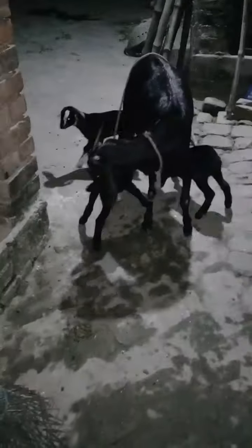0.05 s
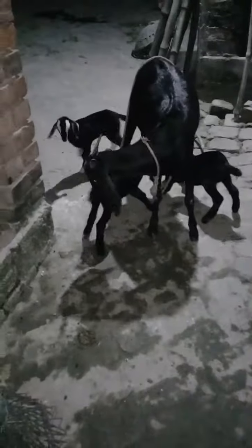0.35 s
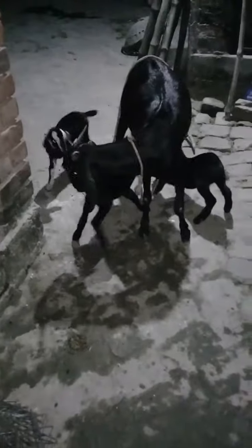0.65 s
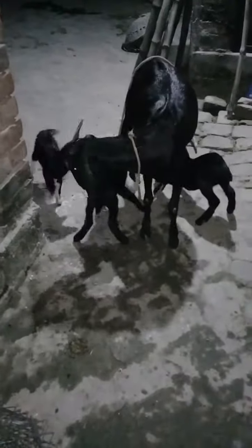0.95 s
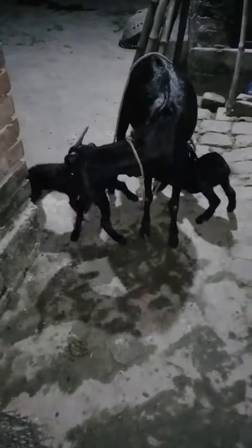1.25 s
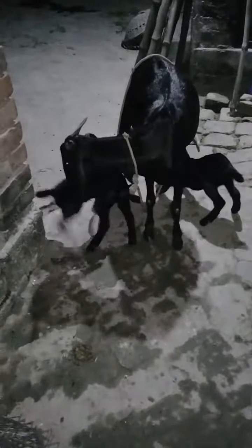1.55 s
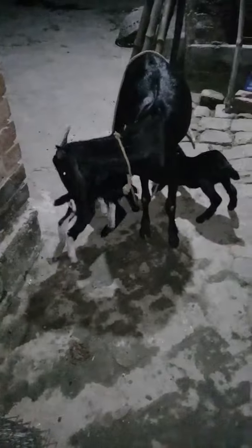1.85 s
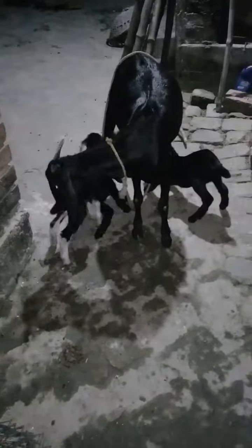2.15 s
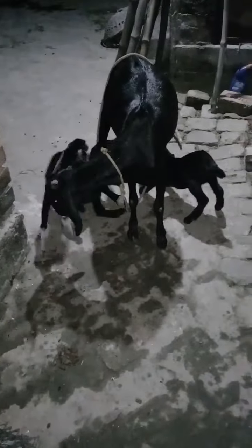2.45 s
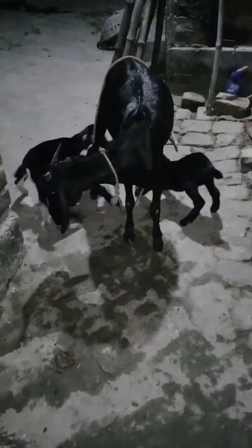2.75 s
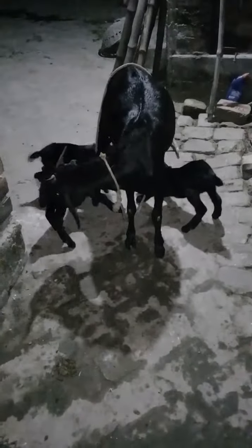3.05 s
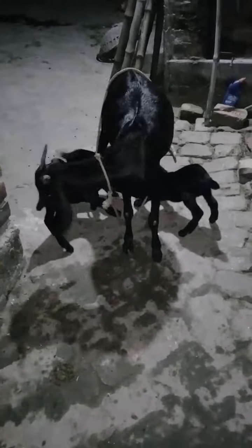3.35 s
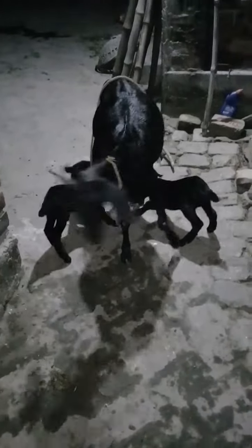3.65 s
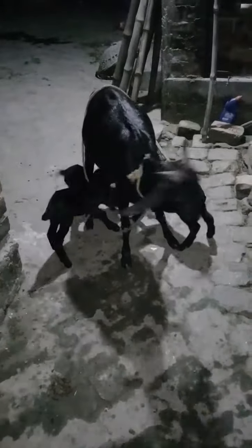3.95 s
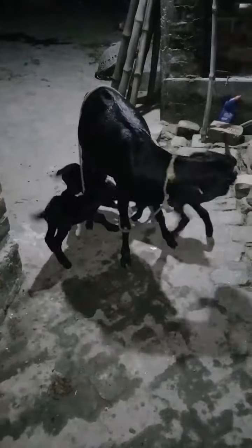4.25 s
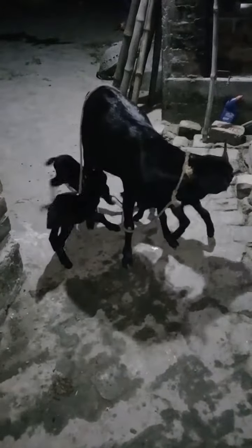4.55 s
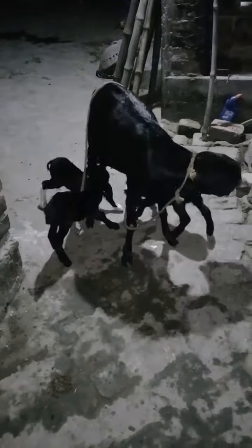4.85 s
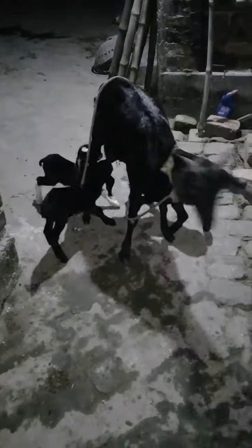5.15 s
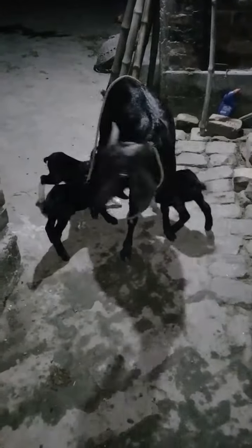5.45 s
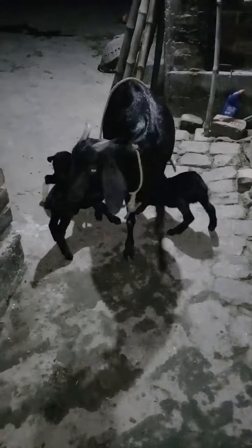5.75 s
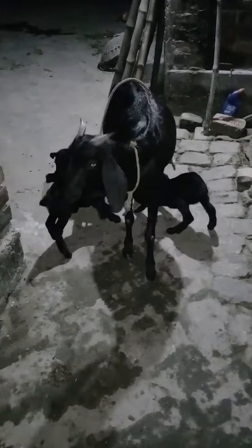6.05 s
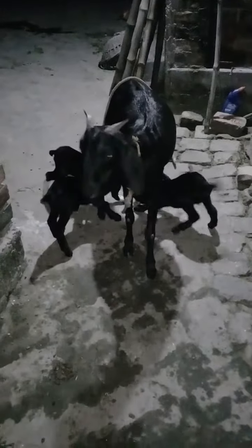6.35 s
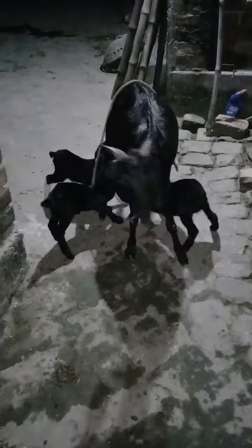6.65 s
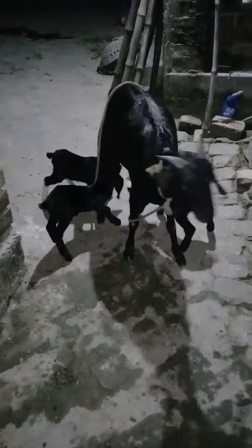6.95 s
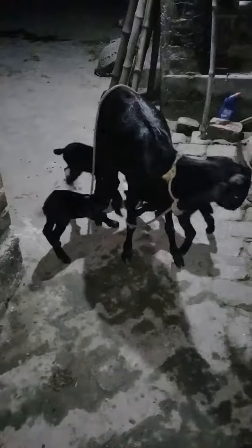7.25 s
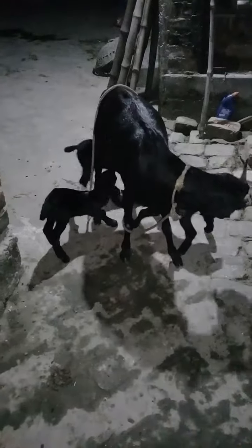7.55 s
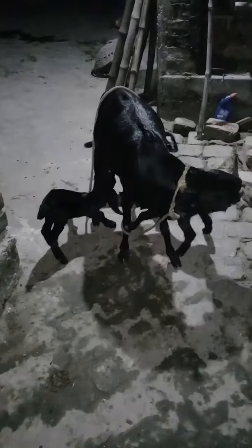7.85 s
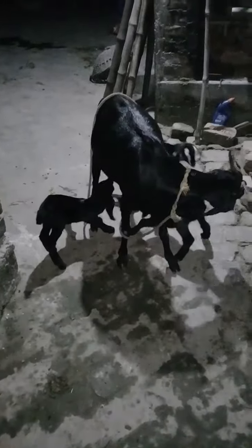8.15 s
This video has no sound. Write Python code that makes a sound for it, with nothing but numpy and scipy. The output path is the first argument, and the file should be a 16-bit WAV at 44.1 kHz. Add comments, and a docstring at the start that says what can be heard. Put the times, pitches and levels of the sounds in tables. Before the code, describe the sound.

Short squeaky calls of goat kids and light shuffling hoof steps in a yard, ending with two rasping bleats, a soft hum behind.

```python
"""Goat kids in a paved yard at night

Kids jostle round their mother with short hoarse squeaks, softer whines and two longer rasping bleats:
slack vocal folds chop the breath, and narrow ringing peaks colour the sound. Hooves tap and scuff on
gritty bricks, and the walls return a short tail. Behind them a low hum swells now and then and dies
down, and distant tones come and go under a faint steady hiss."""
import sys
import numpy as np
from scipy import signal
from scipy.fft import rfft, irfft, next_fast_len
from scipy.io import wavfile
from scipy.ndimage import uniform_filter1d

SR = 44100
rng = np.random.default_rng(int(sys.argv[2]) if len(sys.argv) > 2 else 0)


def master(y):
    """Save y as 16-bit WAV."""
    cut = np.clip(np.atleast_2d(y).T, -1, 1)
    pcm = np.round(cut * 32767)  # scale
    wavfile.write(sys.argv[1], SR, pcm.astype(np.int16))


N = 361175
TIME = np.arange(N) / SR

# calls: t/s, duration/s, level/dB, brightness/dB, pitch shift/semitones, widest gape/share of duration
SQUEAKS = [(1.028, .072, -46, 1, -0.37, 0.56), (1.254, .096, -47.5, 3.5, -0.58, 0.46),
           (1.826, 0.074, -45.5, -6, -0.37, 0.5), (2.072, 0.086, -46.5, 1.5, -0.28, 0.4),
           (2.315, 0.11, -47, 3, -0.44, 0.54), (2.660, 0.079, -50.5, 1, -0.25, 0.49),
           (2.799, 0.089, -44.5, -0.5, 0.07, 0.57), (3.017, 0.1, -45, 3.5, 0.24, 0.5),
           (3.341, 0.09, -43.5, -1, 0.12, 0.45), (3.542, 0.1183, -44.5, 5.5, .1, .42),
           (3.862, .100, -44.5, 2, 0.21, 0.49), (4.027, 0.11, -45, 4.5, .1, 0.56),
           (5.298, 0.074, -43.5, 1, .6, 0.62), (5.473, .110, -44.5, 5.5, 0.27, 0.51)]
WHINES = [(.135, 0.088, -61, -9, -0.34, .42), (.375, 0.088, -53, -3.5, -0.51, 0.68),
          (.800, 0.074, -55, -11, -0.63, .42), (1.974, 0.075, -53, -5.5, .8, .48),
          (4.420, 0.1593, -48, 0.5, .25, 0.17), (4.899, 0.15, -46.5, 2, 0.084, 0.75),
          (5.99, 0.12, -53.5, -5.5, -0.35, 0.62)]
BLEATS = [(6.735, 0.37, -42.5, 4, .2, .64), (7.574, 0.37, -42.5, 4, 0.18, 0.71)]
# narrow ringing peaks that colour the calls: f/Hz, nominal bandwidth/Hz, level/dB
SQUEAK_PEAKS = [(1403, 110, -0.5), (1482, 63, -6.5), (1715, 46.5, 3.5), (1813, 82, 3), (2133, 98, 1),
                (2314, 44, -10.5), (2725, 73, -7.5), (3020, 110, -19.5)]
WHINE_PEAKS = [(1408, 98, 0.5), (1690, 59, 2), (1810, 78, 1), (2107, 86, -1.5), (2250, 59, -19),
               (2520, 79, -18.5)]
BLEAT_PEAKS = [(1071, 30, -13), (1516, 170, -2), (1804, 86, 1), (2123, 155, -5.5), (2334, 37, -4),
               (2918, 51, -11.5)]


def goat_kids():
    """Source and filter: hoarse airflow is shaped into squeaks, closed-mouth whines and long bleats."""
    squeak_air = vocal_folds(flutter_hz=353.3, jitter=.2, rough_db=1.5, pulse_share=0.36)
    bleat_air = vocal_folds(flutter_hz=378.5, jitter=.25, rough_db=2.0, pulse_share=0.42)
    squeaks = shape_calls(SQUEAKS, SQUEAK_PEAKS, squeak_air, attack_s=0.0034, release_s=0.016,
                          arch_db=9, gape_db=7.5, open_s=0.021, close_s=.025, scoop=.07, sag=.02,
                          bend_semitones=.15, shut_db=7, tilt_per_octave=2.25, rasp_db=0)
    whines = shape_calls(WHINES, WHINE_PEAKS, squeak_air, attack_s=0.021, release_s=0.028,
                         arch_db=-1, gape_db=3.5, open_s=0.02, close_s=0.0119, scoop=0.025, sag=0.0212,
                         bend_semitones=0.151, shut_db=6, tilt_per_octave=8.5, rasp_db=-8.5)
    bleats = shape_calls(BLEATS, BLEAT_PEAKS, bleat_air, attack_s=0.04, release_s=0.06,
                         arch_db=1.7, gape_db=10.5, open_s=.045, close_s=0.038, scoop=0.055, sag=0.055,
                         bend_semitones=.45, shut_db=11.5, tilt_per_octave=1.9, rasp_db=-3)
    return squeaks + whines + bleats


def vocal_folds(flutter_hz, jitter, rough_db, pulse_share):
    """Aperiodic oscillation: slack folds flap irregularly and chop the rushing air."""
    cycles = np.cumsum(flutter_hz * np.exp(jitter * drift(300))) / SR
    pulses = unit_power(np.diff(np.floor(cycles), prepend=0))
    airflow = np.sqrt(pulse_share) * pulses + np.sqrt(1 - pulse_share) * noise()
    return unit_power(airflow * from_db(rough_db * drift(160)))


# airy upper peaks, strongest when the mouth is wide open: f/Hz, nominal bandwidth/Hz, level/dB
RASP_PEAKS = [(3490, 340, -25), (4230, 120, -22), (5384, 285, -19), (6110, 110, -24)]
TREMOR_DB, TREMORS_PER_S = 0.87, 70


def shape_calls(calls, peaks, source, attack_s, release_s, arch_db, gape_db, open_s, close_s,
                scoop, sag, bend_semitones, shut_db, tilt_per_octave, rasp_db):
    """Time-varying filtering: a call brightens as the mouth opens, then dulls and sags as it closes."""
    envelope, brightness, pitch, shut, closing = np.zeros((5, N))
    for start, length, db, bright_db, semitones, widest in calls:
        live = (TIME > start) & (TIME < start + length)
        since = TIME[live] - start
        left = length - since
        narrowing = 1 - arch(since, length, widest)
        pitch[live] = semitones - bend_semitones * narrowing
        fade = np.minimum(since / attack_s, 1) * np.minimum(left / release_s, 1)
        envelope[live] = fade * from_db(db - arch_db * narrowing)
        brightness[live] = bright_db - gape_db * narrowing
        shut[live] = np.exp(-(since / open_s) ** 2)
        closing[live] = np.exp(-left / close_s)
    envelope *= from_db(TREMOR_DB * drift(TREMORS_PER_S))
    # the whole voice scoops up at the start and sags at the end
    read_position = np.cumsum(2 ** (pitch / 12) - scoop * shut - sag * closing)
    rasp = [(hz, width_hz, db + rasp_db) for hz, width_hz, db in RASP_PEAKS]
    voice, low_voice = np.zeros((2, N))
    for hz, width_hz, db in list(peaks) + rasp:
        ring = from_db(db) * resonate_twice(source, hz, 1.49 * width_hz)
        ring = np.interp(read_position, np.arange(N), ring)
        treble_weight = np.clip(tilt_per_octave * np.log2(hz / 1600), 0, 1.7)
        muffling_db = shut_db * shut * np.clip((hz - 1500) / 250, 0, 2)
        ring *= from_db(treble_weight * (brightness - 4.1 * closing) - muffling_db)
        voice += ring
        low_voice += ring * (hz < 1950)
    # steady lung pressure holds the power of the low peaks even
    power = np.maximum(uniform_filter1d(low_voice ** 2, size=900), 0) + 0.19 * np.mean(low_voice ** 2)
    return envelope * voice / np.sqrt(power)


# hoof steps: t/s, thud level/dB, clack level/dB
STEPS = [(1.499, -63.5, -82), (1.523, -46, -56.5), (1.661, -52, -71), (1.778, -57, -71),
         (1.852, -43.5, -47.5), (2.295, -60, -70), (2.433, -60, -53), (2.646, -51.5, -60), (2.78, -51, -68),
         (2.819, -42.5, -62), (3.395, -53, -50), (4.611, -66, -56.5), (4.868, -55.5, -58.5),
         (5.287, -58, -78), (5.798, -58, -83), (5.887, -47.5, -78), (6.155, -69, -46), (6.359, -58.5, -83),
         (6.491, -67, -66)]
# hollow ring of a hoof on brick: f/Hz, bandwidth/Hz, level/dB
THUD_MODES = [(287, 100, -2), (622, 130, -2), (823, 68, 6), (1020, 220, -2.5)]


def hooves():
    """Impact excites damped modes: each hoof lands with a hollow thud and a short clack."""
    times, thud_db, clack_db = np.transpose(STEPS)
    knock = noise()
    ring = sum(from_db(db) * (-1) ** k * resonate(knock, hz, width_hz)
               for k, (hz, width_hz, db) in enumerate(THUD_MODES))
    thud = steadied(ring, window_s=0.016) * bursts(times, thud_db, t60=0.07)
    clack = steadied(band(noise(), 1270, 2270, order=3), window_s=0.0047)
    return band(thud, 200, 1400) + clack * bursts(times, clack_db, t60=0.074)


# grit breaking: t/s, snap level/dB, crackle level/dB
SNAPS = [(1.188, -58, -94), (1.3493, -53, -89), (1.523, -44.5, -88), (1.6623, -52, -79), (1.7793, -54, -82),
         (2.0909, -41, -71), (2.296, -50, -89), (2.4896, -43.5, -89), (2.6888, -48.5, -92),
         (3.393, -50.5, -90), (3.6554, -39, -79), (3.694, -37.5, -49), (4.8935, -42, -62),
         (5.6439, -54, -67), (5.668, -52, -61.5), (5.884, -51.5, -89), (5.994, -52.5, -95),
         (6.1578, -42, -89), (6.4623, -60, -71), (6.7693, -47, -100)]
# ring of a snap: f/Hz, level/dB, nominal decay time/s
SNAP_MODES = [(2910, -2.5, 0.019), (3880, 3.5, 0.022), (4140, 5.5, 0.0044), (4780, 5, 0.0036),
              (5840, -12, 0.003)]


def snapping_grit():
    """Brittle fracture: grit snaps under a hoof with a brief high ring and a fine crackle."""
    times, snap_db, crackle_db = np.transpose(SNAPS)
    crush = noise() * bursts(times, snap_db, t60=0.038)
    snap = sum(from_db(db) * resonate(crush, hz, 2.55 / decay_s) for hz, db, decay_s in SNAP_MODES)
    crackle = unit_power(band(noise(), 6200, 14000)) * bursts(times, crackle_db, t60=0.06)
    return band(snap, 2200, 6260, order=3) + crackle


# feet dragging over brick: t/s, duration/s, scuff level/dB, grit level/dB
SCUFFS = [(0, 0.064, -82, -74), (0.092, .1, -64.5, -92), (.37, .16, -87, -74.5), (.83, 0.11, -71.5, -82),
          (1.277, 0.1, -63, -77), (1.49, 0.13, -59, -73), (1.649, 0.079, -56, -69),
          (1.748, 0.16, -57.5, -72), (1.972, 0.068, -61, -85), (2.077, .09, -65.5, -80),
          (2.322, .06, -65, -84), (2.411, 0.12, -57.5, -68), (2.557, 0.079, -63.5, -69.5),
          (2.643, 0.13, -58, -87), (2.798, 0.1, -57, -81), (3.382, 0.16, -62.5, -83),
          (4.462, .07, -67, -74), (5.277, 0.056, -58, -85), (5.494, 0.16, -63, -86),
          (5.616, 0.076, -66.5, -73), (6.157, 0.056, -63, -87), (6.87, 0.11, -66, -77),
          (7.677, 0.11, -59, -81), (8.15, .08, -59.5, -81)]
# a hoof sliding over grit: t/s, duration/s, level/dB
SLIDES = [(0.534, .08, -64), (3.644, 0.075, -46.5)]
# restless shifting between the scuffs: t/s, level/dB
SHIFTING = [(0, -75.5), (1.0, -70.5), (2.0, -73), (2.9, -70.5), (3.2, -78.5), (3.6, -71.5), (5.4, -76.5),
            (6.6, -75), (7.4, -72), (8.1, -81.5)]
# friction spectra: f/Hz, level/dB
SCUFF_SPECTRUM = [(76, -53), (130, -3), (342, -3), (404, -2), (546, -6.5), (801, -4), (1030, -3.5),
                  (1340, -7.5), (2620, -24), (5010, -17), (7000, -29), (9100, -58), (15400, -120)]
GRIT_SPECTRUM = [(3000, -10), (5500, 11.5), (8000, -4), (12000, 1.5), (16000, -1)]
SLIDE_SPECTRUM = [(350, -53), (600, -18), (1140, -1.5), (1240, 0.5), (1430, -4), (1990, -7.5),
                  (2610, -12.5), (5380, -12), (6420, -24), (11500, -25), (15600, -37)]
SHIFT_SWING_DB, SHIFTS_PER_S, SHIFT_GRIT_DB = 3.5, 12, -13.5


def shuffling():
    """Friction on rough brick: many tiny impacts merge into coarse scuffs, fine grit and two slides."""
    starts, lengths, scuff_db, grit_db = np.transpose(SCUFFS)
    shifting = from_db(in_time(SHIFTING)[0] + SHIFT_SWING_DB * drift(SHIFTS_PER_S))
    scuff_level = np.hypot(swells(starts, lengths, scuff_db, top_share=0.37), shifting)
    grit_level = np.hypot(swells(starts, lengths, grit_db, top_share=0.29),
                          from_db(SHIFT_GRIT_DB) * shifting)
    slide_level = swells(*np.transpose(SLIDES), top_share=0.37)
    scuff = colour(grains(per_s=1500, spread_db=1.83) * from_db(2.25 * drift(50)), SCUFF_SPECTRUM)
    scuff /= np.std(band(scuff, 287, 990))
    grit = colour(grains(per_s=3000, spread_db=2.8), GRIT_SPECTRUM)
    slide = colour(grains(per_s=4000, spread_db=2.9), SLIDE_SPECTRUM)
    return scuff_level * scuff + grit_level * grit + slide_level * slide


def yard(direct, t60=0.27, gap_s=.008):
    """Reverberation: brick walls send back a short, exponentially decaying tail."""
    t = TIME[:SR]
    tail = band(noise(), 190, 12200, order=1)[:SR] * from_db(-60 * t / t60) * (t > gap_s)
    tail *= 2 * from_db(-16) / np.sqrt(np.sum(tail ** 2))
    return direct + signal.fftconvolve(direct, tail)[:N]


# slow course of the hum: t/s, hum level/dB, rumble level/dB
HUM_LEVELS = [(0, -55, -68.5), (1.3, -60, -62.5), (2.6, -54.5, -64.5), (3.1, -60.5, -65.5), (3.9, -55, -67),
              (4.7, -58, -62.5), (4.95, -62.5, -68), (5.4, -62, -68), (6.1, -70.5, -70.5), (7.3, -75, -72),
              (7.8, -72, -64.5), (8.19, -82, -75)]
# resonances of the hum: f/Hz, nominal bandwidth/Hz, level/dB
HUM_MODES = [(68.1, 13.2, 0.5), (83.8, 8, -0.5), (97, 6.7, -11.5)]
# brief booms of the hum and dull bumps of the rumble: t/s, duration/s, level/dB
BOOMS = [(0.322, .18, -50), (0.801, .09, -50), (0.885, 0.096, -47), (1.274, 0.13, -47), (1.367, 0.13, -50),
         (1.75, .1, -49), (1.89, 0.091, -50.5), (2.21, 0.16, -48), (2.369, 0.06, -49.5),
         (2.693, 0.16, -46.5), (3.179, 0.13, -46.5), (3.663, 0.055, -48.5), (4.131, 0.11, -50),
         (4.223, .13, -55), (4.603, 0.12, -51), (4.718, 0.066, -51), (5.09, .08, -52.5),
         (5.563, .07, -53.5)]
BUMPS = [(1.3, .08, -59), (1.481, 0.052, -53), (2.331, .06, -52.5), (2.753, 0.061, -56),
         (3.644, 0.094, -57.5), (4.181, 0.081, -59.5), (4.807, 0.076, -57), (5.043, 0.13, -58),
         (5.87, 0.087, -58.5), (6.883, 0.063, -55)]
# rumble above the hum: f/Hz, level/dB
RUMBLE_SPECTRUM = [(30, -18), (60, -2.5), (120, 5), (170, 1), (260, 1), (400, -15), (700, -30.5)]


def hum():
    """Noise-driven resonance: low modes boom up repeatedly, then die down beneath a dull rumble."""
    hum_db, rumble_db = in_time(HUM_LEVELS)
    modes = np.zeros(N)
    for hz, width_hz, db in HUM_MODES:
        mode = resonate(noise(), hz, 1.48 * width_hz)
        modes += from_db(db) * unit_power(resonate(mode, hz, 1.35 * width_hz))
    hum_level = np.hypot(from_db(hum_db), swells(*np.transpose(BOOMS), top_share=0.38))
    drone = band(hum_level * steadied(modes, window_s=0.049), 54.4, 150, order=3)
    rumble_level = np.hypot(from_db(rumble_db), swells(*np.transpose(BUMPS), top_share=0.52))
    return drone + rumble_level * steadied(colour(noise(), RUMBLE_SPECTRUM), window_s=0.043)


# distant tones: start t/s, end t/s, f/Hz, bandwidth per filter pass/Hz, level/dB
FAR_TONES = [(.18, 0.43, 1970, 350, -68.5), (0.445, 0.983, 2840, 507, -76.5), (5.57, 5.862, 2460, 180, -72),
             (6.346, 6.64, 733, 109, -74), (7.116, 7.625, 900, 220, -70), (8.12, 8.262, 960, 90.5, -69),
             (8.137, 8.26, 2010, 160, -64.5)]


def far_tones():
    """Narrow-band noise has a rough pitch: faint hoarse tones swell and fade in the distance."""
    tones = np.zeros(N)
    for start, end, hz, width_hz, db in FAR_TONES:
        swell = np.sin(np.pi * np.clip((TIME - start) / (end - start), 0, 1))
        tones += from_db(db) * swell * unit_power(resonate_twice(noise(), hz, width_hz))
    return tones


# low air noise, hiss common to both ears, hiss opposite between the ears: f/Hz, level/dB
AIR_SPECTRUM = [(15, -43), (25, -16.5), (60, 0.5), (92, 3), (262, -12), (569, -18.5), (911, -17.5),
                (1520, -21), (1940, -23.5), (3300, -26), (4290, -69), (7260, -120)]
HISS_SPECTRUM = [(1760, -36), (3000, -14.5), (3190, -45), (3300, -29), (3590, -18.5), (4090, -8.5),
                 (4320, -1), (5240, 4), (5540, -3.5), (5810, -8.5), (6760, -5), (7290, -17), (7980, -22.5),
                 (13500, -20), (15600, -20.5)]
SIDE_SPECTRUM = [(200, -6), (2000, -16), (4500, -16), (7000, 0), (12000, 3.5), (16000, 2)]
AIR_DB, HISS_DB, SIDE_DB = -66.5, -66.5, -84


def air_and_hiss():
    """Stationary noise: a low rush and a hiss, widened by a faint part in antiphase at the ears."""
    air = from_db(AIR_DB) * colour(noise(), AIR_SPECTRUM)
    hiss = from_db(HISS_DB) * colour(noise(), HISS_SPECTRUM)
    side = from_db(SIDE_DB) * colour(noise(), SIDE_SPECTRUM)
    return air + hiss + side * np.array([[1], [-1]])


def from_db(db):
    """Level to amplitude ratio."""
    return 10 ** (np.asarray(db) / 20)


def unit_power(x):
    """Normalisation to a mean square of one."""
    return x / np.sqrt(np.mean(x ** 2) + 1e-20)


def in_time(rows):
    """Linear interpolation over time, one curve per level column."""
    times, *columns = np.transpose(rows)
    return [np.interp(TIME, times, column) for column in columns]


def noise():
    """White Gaussian noise."""
    return rng.standard_normal(N)


def drift(per_s):
    """Random fluctuation of unit variance, with `per_s` new values a second."""
    return np.interp(TIME * per_s, np.arange(8192), rng.standard_normal(8192)) * np.sqrt(3 / 2)


def grains(per_s, spread_db):
    """Shot noise: random tiny clicks of uneven size, at unit power."""
    sizes = from_db(spread_db * np.minimum(rng.exponential(1, N), 4)) * rng.choice([-1, 1], N)
    return unit_power(sizes * (rng.random(N) < per_s / SR))


def band(x, low_hz, high_hz, order=2):
    """Maximally flat band-pass filter."""
    sections = signal.butter(order, [low_hz, high_hz], "band", fs=SR, output="sos")
    return signal.sosfilt(sections, x + 1e-18)


def colour(x, spectrum):
    """Spectral shaping along a logarithmic frequency axis, at unit power."""
    hz, db = np.transpose(spectrum)
    size = next_fast_len(N)
    bin_hz = np.maximum(np.arange(size // 2 + 1) * SR / size, 1)
    gain = from_db(np.interp(np.log(bin_hz), np.log(hz), db, left=-80, right=-80))
    return unit_power(irfft(rfft(x, size) * gain, size)[:N])


def resonate(x, hz, width_hz):
    """Damped resonator with unit gain at its peak."""
    radius = np.exp(-np.pi * width_hz / SR)
    feedback = [1, -2 * radius * np.cos(2 * np.pi * hz / SR), radius ** 2]
    return signal.lfilter(np.array([1, 0, -1]) * (1 - radius ** 2) / 2, feedback, x + 1e-18)


def resonate_twice(x, hz, width_hz):
    """Resonators in cascade: steeper skirts keep the valleys between peaks dark."""
    return resonate(resonate(x, hz, width_hz), hz, width_hz)


def steadied(x, window_s):
    """Compression evens out the slow level of a noise and keeps its fine grain, at unit power."""
    power = uniform_filter1d(x ** 2, int(window_s * SR))
    return unit_power(x / np.sqrt(np.maximum(power, 0) + 0.39 * np.mean(x ** 2)))


def bursts(times, levels_db, t60):
    """Exponential decay: the envelope jumps at each contact and falls 60 dB in `t60` seconds."""
    jumps = np.zeros(N)
    np.add.at(jumps, np.round(times * SR).astype(int), from_db(levels_db))
    return signal.lfilter([1], [1, -from_db(-60 / (t60 * SR))], jumps + 1e-18)


def swells(starts, lengths, levels_db, top_share):
    """Incoherent addition: each event is one arch, and overlapping ones add in power."""
    power = np.zeros(N)
    for start, length, db in zip(starts, lengths, levels_db):
        live = (TIME > start) & (TIME < start + length)
        power[live] += (from_db(db) * arch(TIME[live] - start, length, top_share)) ** 2
    return np.sqrt(power)


def arch(since, length, top_share):
    """Skewed half sine that reaches one at a given share of the length."""
    return np.sin(np.interp(since / length, [0, top_share, 1], [0, np.pi / 2, np.pi]))


def scene():
    """Superposition: the goats and their reverberation add to the background; only hiss has width."""
    goats = goat_kids() + hooves() + snapping_grit() + shuffling()
    return yard(goats) + hum() + far_tones() + air_and_hiss()


def record(dry, cutoff_hz=15700):
    """Band limiting: a steep elliptic low-pass removes the highest treble."""
    return signal.sosfilt(signal.ellip(10, .1, 80, cutoff_hz, fs=SR, output="sos"), dry)


dry = scene()
out = record(dry)
master(out)
```